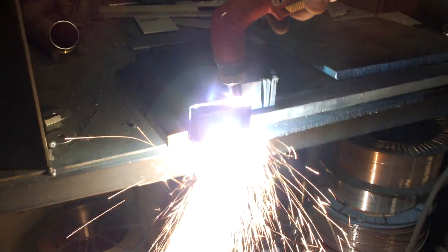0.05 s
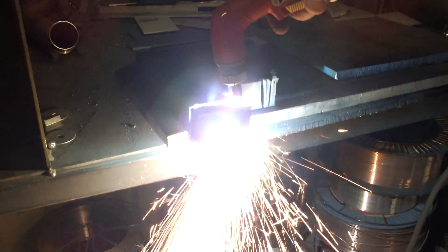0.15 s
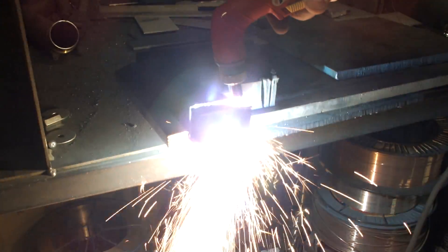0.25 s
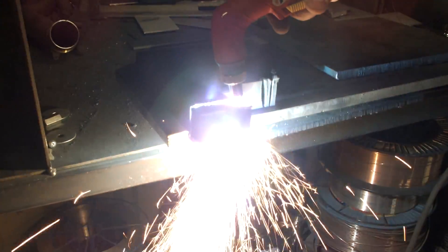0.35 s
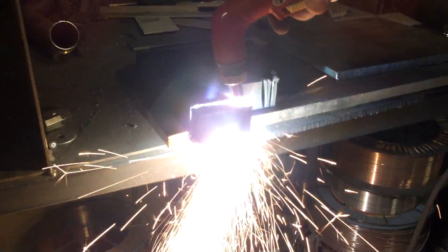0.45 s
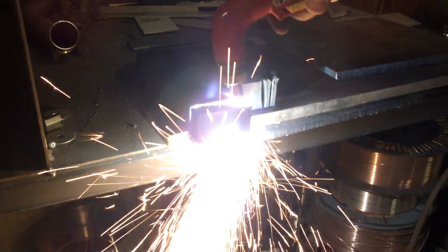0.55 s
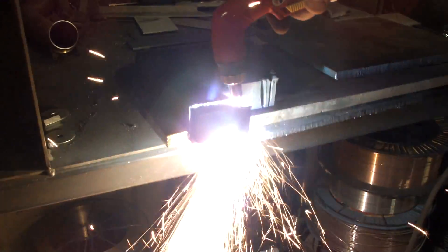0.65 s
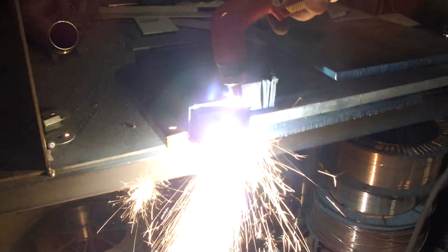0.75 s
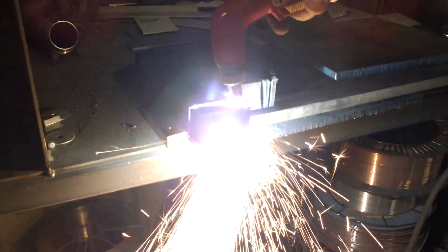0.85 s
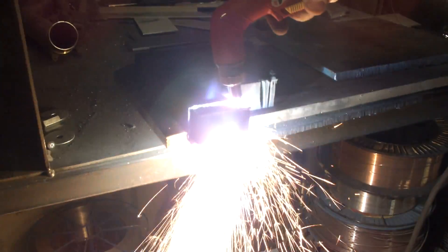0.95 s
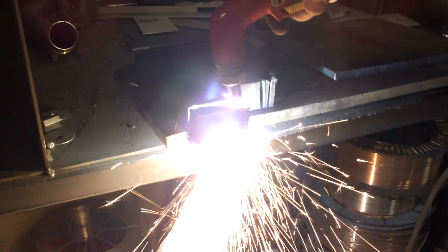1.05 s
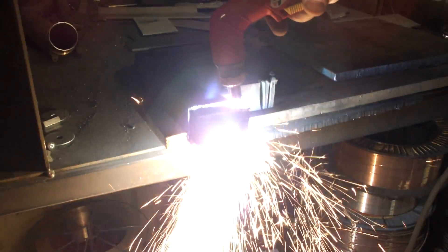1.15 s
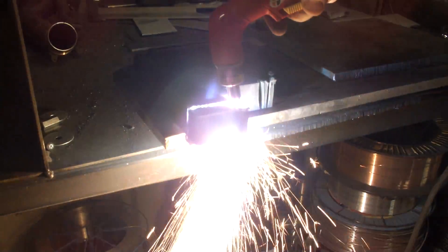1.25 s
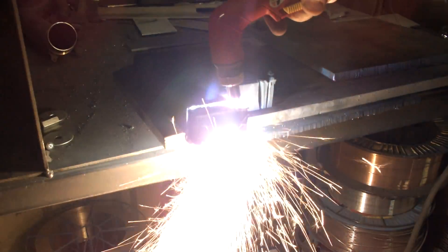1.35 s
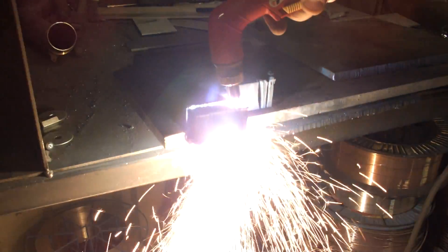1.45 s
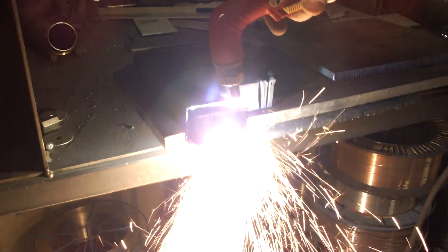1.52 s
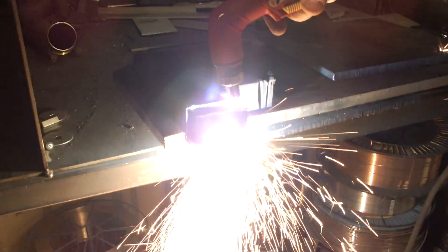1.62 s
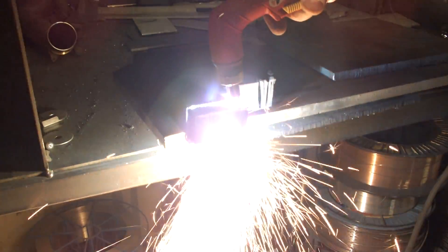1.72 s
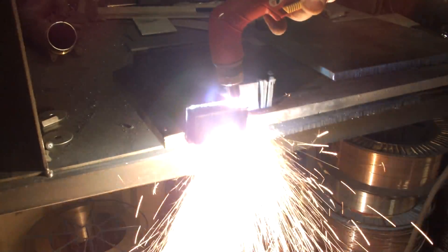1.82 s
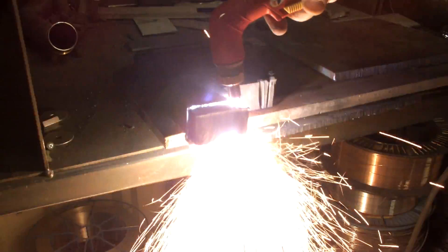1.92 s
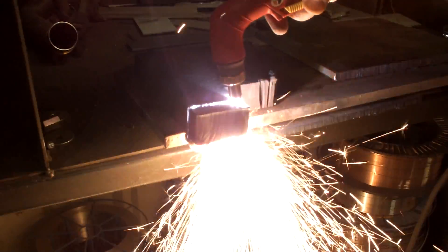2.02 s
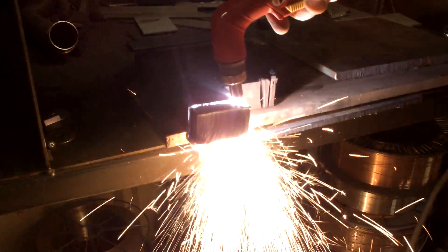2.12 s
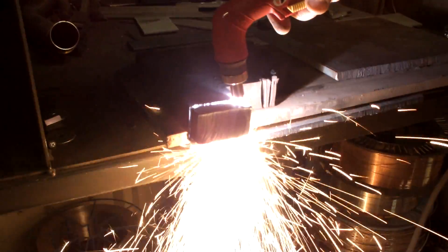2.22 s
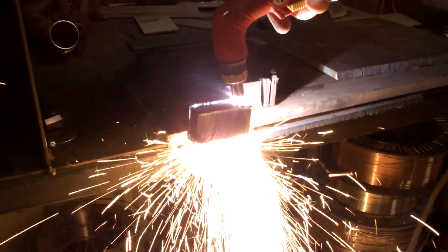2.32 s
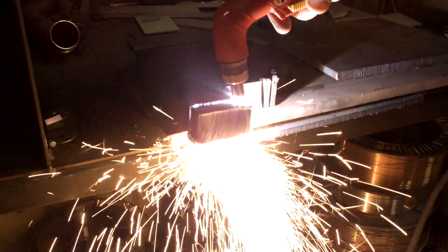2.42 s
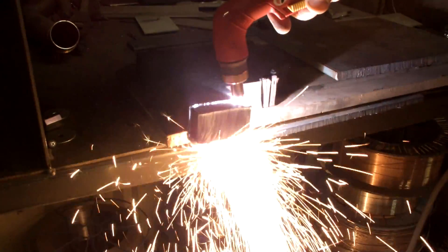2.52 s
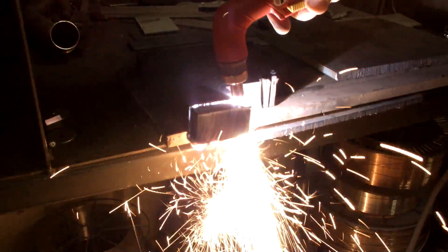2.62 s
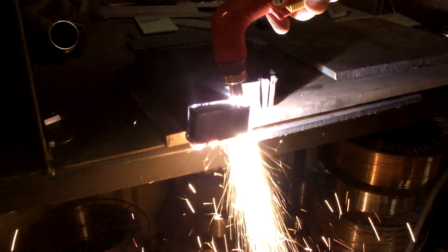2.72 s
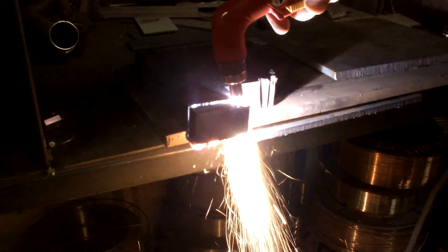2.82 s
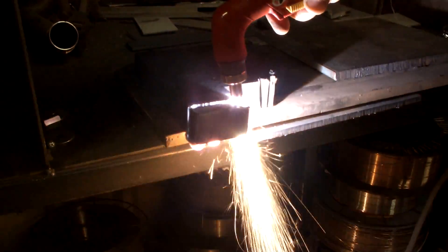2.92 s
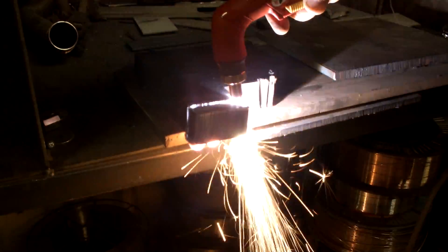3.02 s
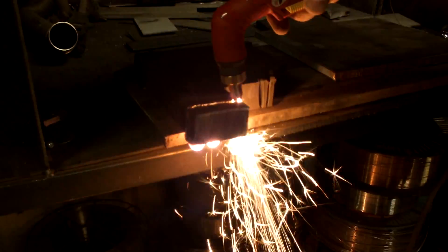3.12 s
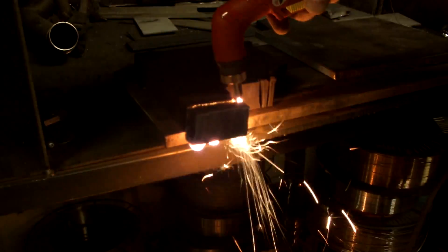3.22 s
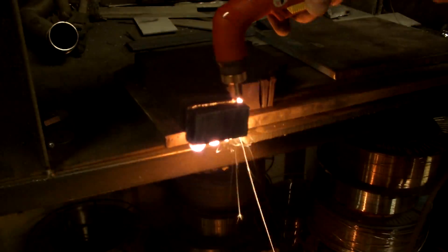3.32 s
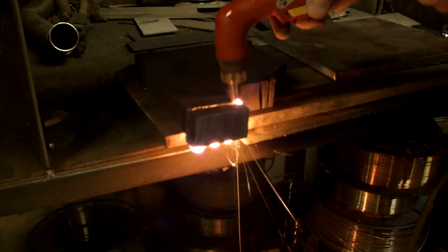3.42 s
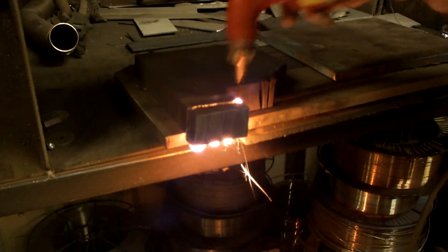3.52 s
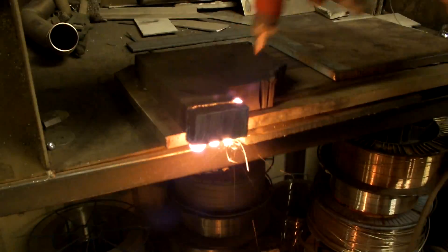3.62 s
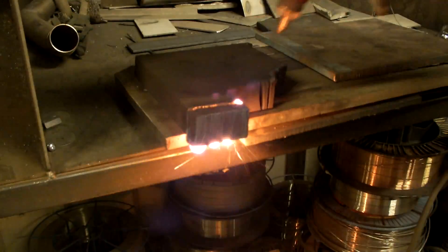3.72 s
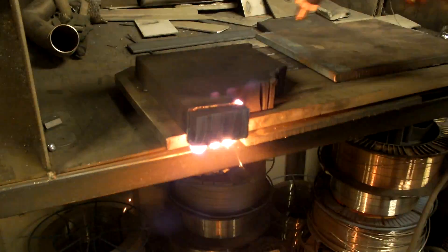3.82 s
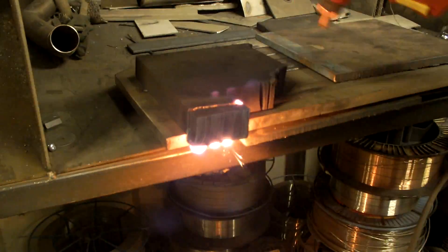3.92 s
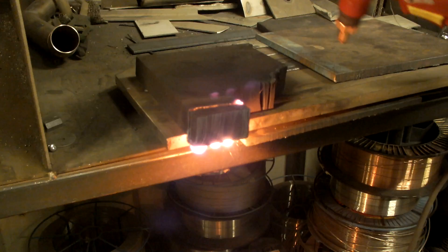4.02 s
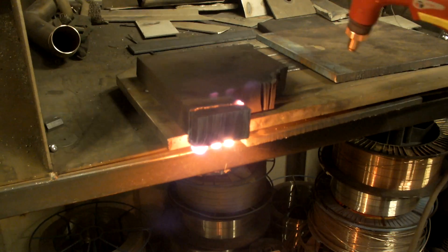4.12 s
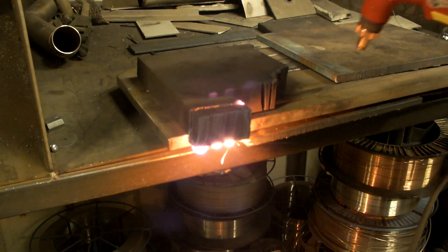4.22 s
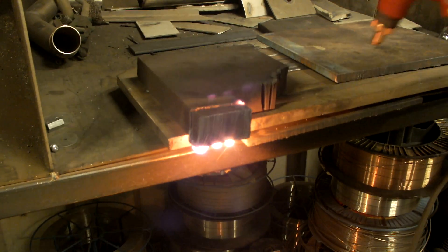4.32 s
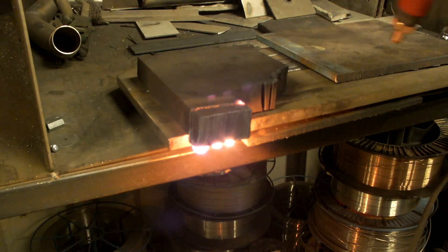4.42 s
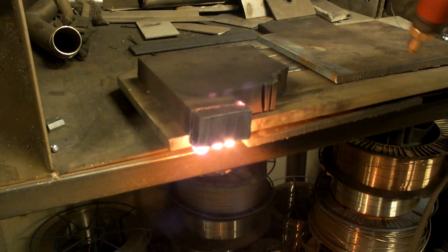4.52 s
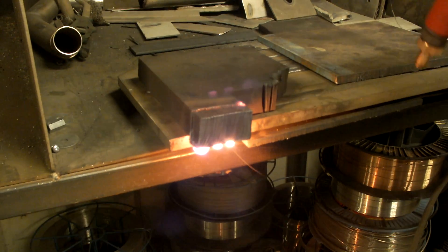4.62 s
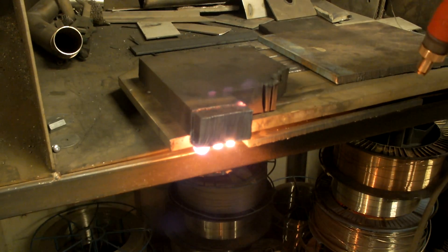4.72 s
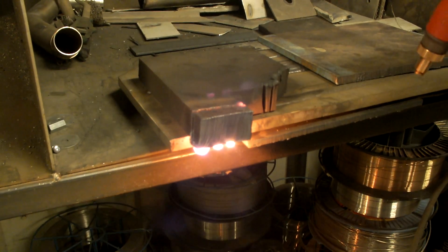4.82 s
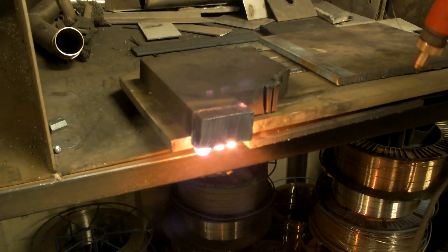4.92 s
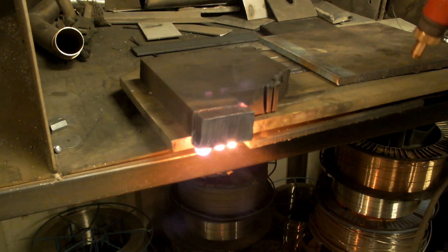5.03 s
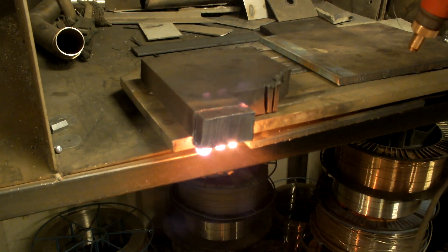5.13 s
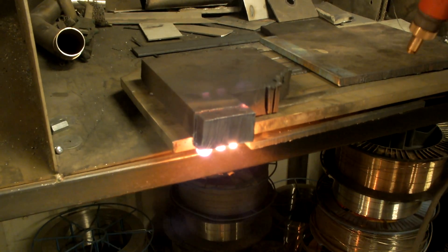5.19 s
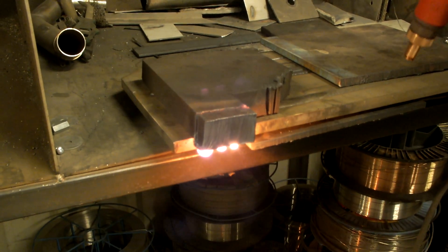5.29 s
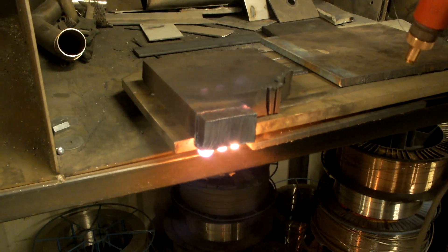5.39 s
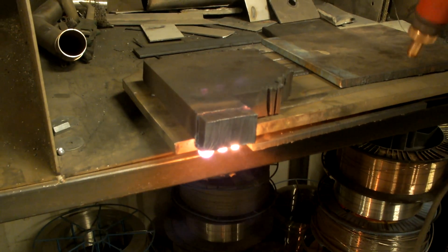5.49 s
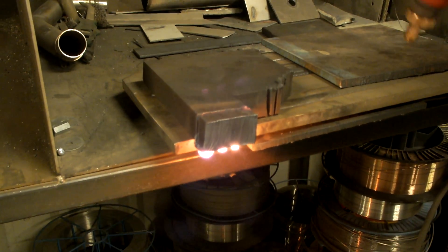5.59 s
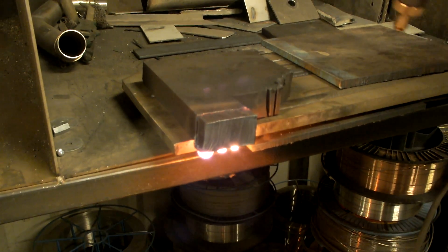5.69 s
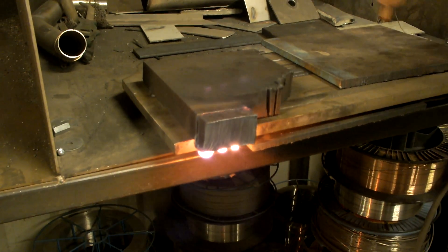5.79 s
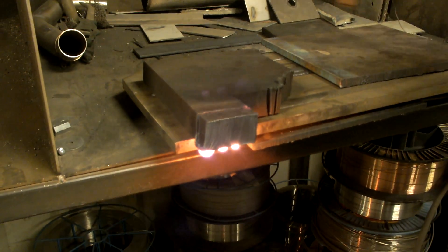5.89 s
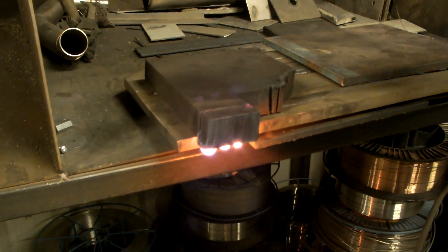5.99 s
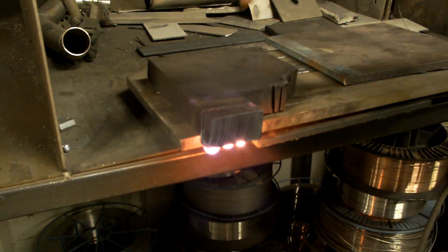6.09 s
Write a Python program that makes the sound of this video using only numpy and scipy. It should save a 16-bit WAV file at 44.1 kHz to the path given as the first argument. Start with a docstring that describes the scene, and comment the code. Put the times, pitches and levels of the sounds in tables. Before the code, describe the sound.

Close, dense roar of a cutting arc, fizzy and nearly constant, with low sputtering beneath and a thin electrical whine that fades before the end. The arc snaps off halfway. Much softer air rushes from the torch, muffled by the cut and then free and thin. Gear knocks dully, one plate rings briefly, and a sole scrapes the floor. Indoor workshop, stereo camera nearby, top treble cut off.

```python
"""In a workshop, a plasma torch cuts a thick steel block, a metre or two from a small stereo camera.
The arc jet is coloured noise, with slag and hot draught rumbling below it and a sine for the inverter's whine.
When the arc dies, the cooling air hisses on: first into the kerf (the cut slot), then free from the lifted torch.
Noise bursts with ringing notes make the gear's knocks, and three noises in short swells make a sole's scuffs.
Behind it all a fan hums in wavering tones over the dull rush of the shop air."""
import sys
import numpy as np
from scipy import signal
from scipy.fft import rfft, irfft, next_fast_len
from scipy.io import wavfile
from scipy.ndimage import uniform_filter1d

SR = 44100
rng = np.random.default_rng(int(sys.argv[2]) if len(sys.argv) > 2 else 0)


def generate_wav(signal):
    """Clip the signal to [-1, 1] and save it as 16-bit WAV at the path in sys.argv[1]."""
    frames = np.transpose(np.atleast_2d(signal))
    scaled = np.clip(frames, -1, 1) * 32767
    pcm = np.round(scaled).astype(np.int16)
    wavfile.write(sys.argv[1], SR, pcm)


N = 271215  # length in samples
LEFT_RIGHT = np.array([[1], [-1]])


def undb(db):
    """Turn decibels into a plain factor."""
    return 10 ** (np.asarray(db) / 20)


def level(x, db):
    """Scale a sound to an average (rms) level in dB."""
    return x * undb(db) / np.sqrt(np.mean(x ** 2))


def curve(rows):
    """Join the rows of a (time, value, ...) table by straight lines, one value per sample and column."""
    s, *columns = np.transpose(rows)
    t = np.arange(N) / SR
    return [np.interp(t, s, column) for column in columns]


def faded_curve(rows):
    """Like curve, but the first column drops by 60 dB within 10 ms outside the table's time span."""
    s = np.transpose(rows)[0]
    t = np.arange(N) / SR
    edge_db = np.interp(t, [s[0] - .01, s[0], s[-1], s[-1] + .01], [-60, 0, 0, -60])
    first, *rest = curve(rows)
    return [first + edge_db] + rest


def along(points, hz):
    """Join (pitch, value) points by straight lines over a logarithmic pitch axis."""
    f, v = np.transpose(points)
    return np.interp(np.log(hz + 1), np.log(f + 1), v)


def panned(db, left_minus_right_db):
    """Left and right factors for a level and a level difference between the sides."""
    return np.stack([undb(db + left_minus_right_db / 2), undb(db - left_minus_right_db / 2)])


def walk(rate):
    """Slow random curve of rms 1 that turns about rate times a second."""
    k = int(SR / rate)
    smooth = uniform_filter1d(uniform_filter1d(rng.standard_normal(N), k), k)
    return level(smooth, 0)


def hiss(colour, alike, lean, peaks=(), echo_rad=0, room_db=2.5, lag_s=0):
    """Stereo noise of rms 1, shaped by pitch in strength, likeness of the two sides and lean to the left."""
    size = next_fast_len(N)
    hz = np.arange(size // 2 + 1) * SR / size
    peak_db = sum(db / (1 + (2 * (hz - f) / width) ** 2) for f, width, db in peaks)
    # at a peak one sound path rules, so both sides agree more
    likeness = np.clip(along(alike, hz) + 0.041 * peak_db, -.95, .99)
    mid, side = rfft(rng.standard_normal((2, size)))
    pair = np.sqrt(1 + likeness) * mid + LEFT_RIGHT * np.sqrt(1 - likeness) * side
    # nearby echoes twist the phase between the sides every few hundred hertz
    twist = echo_rad * np.interp(hz, np.arange(0, SR, 250), rng.standard_normal(SR // 250 + 1))
    # a lag makes the left side late
    twist -= 2 * np.pi * hz * lag_s
    # far walls add a fine fixed ripple over pitch
    room = room_db * np.interp(hz, np.arange(0, SR, 16), rng.standard_normal(SR // 16 + 1))
    gain = undb(along(colour, hz) + room + peak_db + LEFT_RIGHT * along(lean, hz) / 2)
    turn = np.exp(.5j * LEFT_RIGHT * twist)
    return level(irfft(pair * gain * turn, size)[:, :N], 0)


def flicker(x, shared_db, own_db, rate):
    """Turbulence: all pitches surge together, and each third-octave band also flutters alone."""
    hz, s, z = signal.stft(x, SR, nperseg=256)
    edges = 100 * 2 ** np.arange(0, 8, 1 / 3)
    k = max(int(SR / 128 / rate), 1)
    # one random walk for each band, and a last one shared by all
    noise = rng.standard_normal((len(edges) + 1, len(s)))
    walks = uniform_filter1d(uniform_filter1d(noise, k), k)
    walks /= walks.std()
    # blend neighbouring bands smoothly
    place = np.interp(np.log(hz + 1), np.log(edges), np.arange(len(edges)))
    low = np.minimum(place.astype(int), len(edges) - 2)
    share = (place - low)[:, None]
    own = walks[low] * (1 - share) + walks[low + 1] * share
    flickered = z * undb(shared_db * walks[-1] + own_db * own)
    return signal.istft(flickered, SR, nperseg=256)[1][:, :N]


# strength of the arc jet: start_s [s], level_db [dB], left_minus_right_db [dB]
JET_LEVEL = [(0.0, -15.5, 1.5), (0.81, -15.5, 1), (0.97, -15.7, 1.5), (1.83, -16.5, 1), (2.41, -19, 0),
             (2.7, -16, -0.5), (2.85, -16.5, 0.5), (2.91, -17.2, -0.5), (3.05, -15.5, 0)]
# how far the jet has burst out below: start_s [s], share [0-1]
BREAKTHROUGH = [(0, 0.042), (1.0, 0.12), (1.4, 0.079), (2.03, 0.18), (2.12, 0.58), (2.5, 1), (2.65, 0.61),
                (3.05, 0.67)]
# jet colour while buried in the kerf, and after it breaks through: pitch_hz [Hz], relative_db [dB per Hz]
BURIED_COLOUR = [(410, -31), (700, -14.5), (1930, -9.5), (2170, -8.5), (2750, -7.5), (3610, -4.5),
                 (4160, -5.5), (5620, 0), (7290, -3.5), (8190, -3), (8740, -1), (9210, -3), (11600, -2),
                 (14300, -5.5), (15700, -11)]
THROUGH_COLOUR = [(350, -50), (600, -9.5), (778, -17.5), (844, -10.5), (1400, -7), (1520, -7), (1840, -6.5),
                  (2450, -2.5), (2810, -1.5), (4920, -1.5), (7210, -5), (8380, 2), (9730, -9), (11600, -1),
                  (15700, -10.5)]
# narrow peaks that room echoes put on the jet noise, before and after the breakthrough:
# pitch_hz [Hz], width_hz [Hz], boost_db [dB]
ECHO_PEAKS_BURIED = [(2228, 90, 4.2), (2422, 90, 3.7), (2627, 53, 3.1), (3305, 90, 3.9), (3692, 90, 3.2),
                     (4392, 90, 4.7), (4575, 70, 4.7), (4855, 74, 4.2), (5071, 90, 6.4), (5469, 90, 3.6),
                     (5706, 53, 3.9), (5986, 90, 4.9), (6610, 51, 3.0), (6761, 46, 4.1), (6987, 66, 5.1),
                     (7181, 61, 3.2), (7838, 83, 4.3), (7967, 90, 5.6), (8247, 65, 3.4), (9033, 70, 4.3),
                     (9237, 75, 4.9), (9614, 51, 3.8), (9722, 90, 3.9), (10400, 90, 3.3), (10529, 90, 3.7),
                     (11240, 68, 3.2), (11423, 89, 4.2), (12456, 90, 3.6)]
ECHO_PEAKS_THROUGH = [(1518, 90, 5.3), (1744, 67, 4.8), (1970, 59, 4.0), (2250, 90, 5.2), (2444, 90, 6.4),
                      (3326, 90, 4.7), (4565, 90, 3.6), (5092, 90, 5.2), (5760, 90, 3.9), (6201, 90, 5.5),
                      (6847, 90, 5.1), (7213, 90, 4.2), (7816, 74, 4.7), (8204, 73, 5.3), (9033, 53, 4.2),
                      (9226, 83, 3.8), (10109, 90, 4.1), (10712, 90, 4.1), (11014, 90, 4.1),
                      (12629, 88, 4.2), (12844, 72, 4.8), (13964, 90, 4.2)]
# likeness of the two sides near the jet: pitch_hz [Hz], likeness [0-1]
JET_ALIKE = [(60, 0.14), (130, 0.19), (290, 0.17), (640, 0.39), (1410, 0.61), (3100, 0.7), (6820, 0.5),
             (15000, 0.4)]
# lean of the jet to the left: pitch_hz [Hz], left_minus_right_db [dB]
JET_LEAN = [(60, 4), (110, 4), (200, 5), (380, 4), (700, 5), (1290, 4.5), (2380, -0.5), (4400, -1),
            (8120, 1.5), (15000, 0.5)]


def arc_jet():
    """The hot gas jet roars as turbulent noise; its middle pitches fill in once it is through the steel."""
    jet_db, pan_db = curve(JET_LEVEL)
    through = curve(BREAKTHROUGH)[0]
    buried = hiss(BURIED_COLOUR, JET_ALIKE, JET_LEAN, ECHO_PEAKS_BURIED, echo_rad=0.64, room_db=2.14)
    free = hiss(THROUGH_COLOUR, JET_ALIKE, JET_LEAN, ECHO_PEAKS_THROUGH, echo_rad=0.39, room_db=2.8)
    # square roots share out the power between the two colours
    roar = np.sqrt(1 - through) * buried + np.sqrt(through) * free
    return flicker(roar, shared_db=0.6, own_db=0.71, rate=11.0) * panned(jet_db, pan_db)


# strength of the sounds below the cut: start_s [s], slag_db [dB], draught_db [dB]
BELOW_LEVEL = [(0, -40.5, -52), (.37, -36, -50.5), (1.1, -39, -53), (1.3, -37, -50), (1.57, -46.5, -59),
               (1.7, -38.5, -53), (2.1, -44, -60), (2.27, -44, -72), (2.45, -46.5, -59), (2.77, -39.5, -50),
               (3.06, -42.5, -56)]
# colours of the molten slag and of the hot draught: pitch_hz [Hz], relative_db [dB per Hz]
SLAG_COLOUR = [(120, -43), (200, -4.5), (473, -1.5), (882, -6.5), (968, -6), (1500, -7.5), (1950, -7),
               (3300, -120)]
DRAUGHT_COLOUR = [(15, -44), (25, -15), (86, -5.5), (172, -1), (190, -18), (250, -35), (420, -120)]


def below_the_cut():
    """Molten slag sputters out below as flickering noise; hot draught rumbles under the bench."""
    slag_db, draught_db = curve(BELOW_LEVEL)
    slag = flicker(hiss(SLAG_COLOUR, JET_ALIKE, JET_LEAN), shared_db=2.5, own_db=0.5, rate=16)
    draught = hiss(DRAUGHT_COLOUR, JET_ALIKE, JET_LEAN)
    return slag * undb(slag_db) + draught * undb(draught_db)


# inverter tone in the arc, before ripple and shake: start_s [s], level_db [dB]
WHINE_LEVEL = [(0, -32), (.45, -26), (.87, -30), (1.02, -31), (1.23, -30), (1.43, -25.5), (1.9, -26.5),
               (2.05, -33), (2.19, -30), (2.28, -38), (2.36, -34), (2.47, -35)]
WHINE_HZ, RIPPLE_HZ, RIPPLE_DEPTH = 8633.5, 100, .45


def inverter_whine():
    """The arc sings at the inverter's switching tone, a high sine rippled by the mains."""
    t = np.arange(N) / SR
    # ripple on the arc current puts a side line above and below the tone
    ripple = 1 + RIPPLE_DEPTH * np.cos(2 * np.pi * RIPPLE_HZ * t)
    # the wandering arc length shakes the tone's phase and strength
    phase_shake = undb(-36) * walk(30)  # radians
    strength_shake_db = 1.1 * walk(25)
    tone = np.sqrt(2) * ripple * np.sin(2 * np.pi * WHINE_HZ * t + phase_shake)
    return tone * panned(faded_curve(WHINE_LEVEL)[0] + strength_shake_db, 2.5)


ARC_OFF_S, ARC_OFF_T60_S = 3.066, .06  # when the arc dies, and its time to fall by 60 dB


def arc():
    """Jet, slag and draught die with the arc; the whine fades out over half a second earlier."""
    t = np.arange(N) / SR
    alive = undb(-60 * np.maximum(t - ARC_OFF_S, 0) / ARC_OFF_T60_S)
    return alive * (arc_jet() + below_the_cut() + inverter_whine())


# strength of the air blown into the kerf: start_s [s], roar_db [dB], edge_fizz_db [dB]
KERF_AIR_LEVEL = [(3.075, -30.5, -34), (3.15, -36, -37.5), (3.27, -34.5, -35), (3.4, -32, -35),
                  (3.5, -38.5, -30.5), (3.55, -35, -36), (3.585, -45, -50), (3.74, -52, -48),
                  (3.8, -55, -50)]
# colours of the roar in the kerf and the fizz on its edge: pitch_hz [Hz], relative_db [dB per Hz]
KERF_COLOUR = [(530, -40), (900, -18), (1120, -14.5), (1980, -8.5), (2200, -4.5), (2780, -3), (3240, -5),
               (3470, -5.5), (4590, -8), (4910, -8), (5500, -8.5), (7150, -31), (12100, -120)]
EDGE_COLOUR = [(3240, -28), (5500, -1), (6640, -2.5), (7810, -1), (9110, -3.5), (12300, -3.5), (14700, -7),
               (15700, -15)]
# lean to the left of the kerf roar, the free air and the shop sounds: pitch_hz [Hz], left_minus_right_db [dB]
SHOP_LEAN = [(60, 3), (110, 3), (200, 0), (380, 1.5), (700, 3.5), (1290, 3), (2380, -0.5), (4400, -1.0),
             (8120, 2), (15000, 0)]


def kerf_air():
    """Cooling air roars inside the kerf and fizzes on its edge, as two turbulent noises."""
    roar_db = faded_curve(KERF_AIR_LEVEL)[0]
    fizz_db = faded_curve(np.array(KERF_AIR_LEVEL)[:, [0, 2]])[0]
    roar = undb(roar_db) * hiss(KERF_COLOUR, JET_ALIKE, SHOP_LEAN, echo_rad=0.45)
    fizz = undb(fizz_db) * hiss(EDGE_COLOUR, JET_ALIKE, JET_LEAN, echo_rad=0.3)
    return flicker(roar + fizz, shared_db=0.4, own_db=1.0, rate=16)


# strength of the air from the lifted nozzle: start_s [s], level_db [dB], left_minus_right_db [dB]
FREE_AIR_LEVEL = [(3.54, -43, 2), (3.62, -37.5, 1.5), (3.73, -34.5, 0), (3.93, -34, 0.5),
                  (4.2, -33.5, -0.5), (4.72, -35, -1), (5.0, -33, -0.5), (5.4, -34.5, -1),
                  (5.8, -33.5, -0.5), (6.15, -32, 0)]
# colour of that hiss: pitch_hz [Hz], relative_db [dB per Hz]
FREE_COLOUR = [(710, -40), (1200, -12), (1730, -9.5), (1950, -9), (2100, -3.5), (2810, -5.5), (2900, -1.5),
               (3130, -3), (4320, -2), (5470, -2), (8600, 0.5), (10800, 1), (14600, 2.5), (15700, -3.5)]
# likeness of its two sides: pitch_hz [Hz], likeness [0-1]
FREE_ALIKE = [(1000, 0.59), (3000, 0.95), (7000, 0.17), (11000, 0.29), (15000, 0.26)]
FREE_LAG_S = 3.8e-5  # the hiss reaches the left side this much late


def free_air():
    """The lifted nozzle blows into open air: a thin hiss that shifts a little between the sides."""
    level_db, pan_db = faded_curve(FREE_AIR_LEVEL)
    air = hiss(FREE_COLOUR, FREE_ALIKE, SHOP_LEAN, lag_s=FREE_LAG_S)
    return flicker(air, shared_db=0.64, own_db=0.14, rate=10) * panned(level_db, pan_db)


# knocks of the welder's gear, one row for each body that a blow shakes: start_s [s], level_db [dB],
# centre_hz [Hz], width [octaves], rise_s [s], hold_s [s], t60_s [s],
# note_db and ring_db [dB, relative to level_db]
KNOCKS = [(3.382, -32, 257, 0.63, 0.012, 0.013, 0.17, -16, -40),
          (3.397, -37.5, 746, 0.65, 0.0074, 0.017, 0.22, -20, -40),
          (3.535, -29, 896, 0.68, 0.0043, 0.0077, 0.16, -11, -3.5),
          (3.543, -39.5, 246, 0.94, .008, 0.017, 0.61, -20, -40),
          (4.823, -30, 768, 1.1, 0.0069, 0.031, 0.23, -9, -40),
          (4.824, -32, 2440, 0.89, 0.0035, 0.024, 0.22, -30, -40),
          (4.831, -38.5, 380, 1.3, 0.0092, 0.029, 0.92, -6.5, -40),
          (5.336, -25, 1970, 0.88, 0.0027, .003, 0.094, -20, -40)]
# notes of the knocked plate: pitch_hz [Hz], relative_db [dB], t60_s [s]
PLATE_NOTES = [(692, -11, 0.65), (869, -3, 0.23), (1350, -2, 0.3), (1440, -2, .3), (1543, 1, 0.42),
               (1520, -8, 0.41), (2050, -10, 0.43), (3550, -6, .12)]


def knocks():
    """Distant blows, smeared by the room into short dull bursts; a plate rings along, mostly faintly."""
    out = np.zeros((2, N + SR))
    t = np.arange(SR // 2) / SR
    hz = np.arange(len(t) // 2 + 1) * 2 + 1.
    for s, level_db, centre_hz, octaves, rise_s, hold_s, t60_s, note_db, ring_db in KNOCKS:
        mid, side = rng.standard_normal((2, len(t)))
        pair = mid + 0.23 * side * LEFT_RIGHT
        # a hump of noise, 12 dB down at the given width either side of its centre
        hump = undb(-12 * (np.log2(hz / centre_hz) / octaves) ** 2)
        body = level(irfft(rfft(pair) * hump, len(t)), -6.0)
        note = undb(note_db) * np.sin(2 * np.pi * centre_hz * t)
        blow = (body + note) * undb(-60 * np.maximum(t - hold_s, 0) / t60_s)
        for f, db, ring_t60_s in PLATE_NOTES:
            ring = np.sin(2 * np.pi * (f * t + rng.random()))
            blow = blow + undb(ring_db + db - 60 * t / ring_t60_s) * ring
        start = int(s * SR)
        out[:, start:start + len(t)] += undb(level_db) * blow * np.minimum(t / rise_s, 1)
    return out[:, :N] * undb(1.5 * LEFT_RIGHT)


# drags of a sole, start_s being the end of the rise: start_s [s], length_s [s], boom_db [dB], rub_db [dB],
# grit_db [dB]
SCUFFS = [(3.594, 0.04, -50, -41, -43.5), (3.695, 0.055, -56, -46, -45), (3.88, 0.023, -60, -48, -45.5),
          (4.157, 0.15, -54.5, -45, -47), (4.352, 0.14, -55, -45, -50), (4.905, 0.069, -52, -56, -54),
          (5.05, .06, -65, -59, -51), (5.143, .07, -47, -54, -52), (5.233, 0.071, -41.5, -42.5, -47.5),
          (5.326, 0.037, -38.5, -34.5, -29.5), (5.419, 0.035, -37, -37, -32), (5.487, 0.038, -38, -44, -47),
          (5.6, 0.059, -50.5, -56, -49), (5.873, 0.024, -66, -65, -53), (6.1, .05, -52.5, -52, -48)]
SCUFF_RISE_S, SCUFF_T60_S = 0.031, 0.29
# likeness of the two sides for the shop sounds: pitch_hz [Hz], likeness [0-1]
SHOP_ALIKE = [(60, 0.82), (130, 1), (290, 0.91), (640, 0.96), (1410, 0.74), (3100, 0.28), (6820, 0.57),
              (15000, 0.26)]


def scuffs():
    """A sole dragged over the floor: the floor booms, the sole rubs, grit scratches."""
    # colours: (Hz, relative dB per Hz)
    boom = hiss([(50, -55), (150, -24), (300, -6), (450, -4.5), (650, -1), (1000, -31)],
                SHOP_ALIKE, SHOP_LEAN)
    rub = hiss([(500, -23.5), (800, -4.0), (1050, -0.5), (1450, -5), (2200, -23)],
               SHOP_ALIKE, SHOP_LEAN)
    grit = hiss([(1200, -13), (1900, 4.5), (2500, 3.5), (3600, -0.5), (4600, -16), (8000, -40)],
                SHOP_ALIKE, SHOP_LEAN)
    t = np.arange(N) / SR
    power = 0
    for s, drag_s, *layers_db in SCUFFS:
        # each drag digs in, holds, then dies away in the room
        rise = np.clip(1 + (t - s) / SCUFF_RISE_S, 0, 1)
        fall = undb(-60 * np.maximum(t - s - drag_s, 0) / SCUFF_T60_S)
        power = power + (undb(layers_db)[:, None] * rise * fall) ** 2
    out = sum(layer * np.sqrt(p) for layer, p in zip((boom, rub, grit), power))
    return flicker(out, shared_db=0.5, own_db=1.7, rate=40)


# first and second blade tone before the hum curve: one level_db [dB] each
BLADE_LEVEL = (-60.5, -65.5)
# rise and fall of the hum: start_s [s], change_db [dB]
HUM_CHANGE = [(0, 2), (1.7, -1), (2.4, 2.5), (3.0, 10.5), (3.2, -5), (4.2, 0.5), (5.2, 1.5), (6.15, 1)]
BLADE_HZ, BLADE_WANDER_DB = 207.1, 2.6


def fan_hum():
    """Fan blades chop the air into two low tones that waver with the air load."""
    t = np.arange(N) / SR
    out = np.zeros((2, N))
    slow = signal.butter(1, 9.0, fs=SR, output="sos")
    for order, db in enumerate(BLADE_LEVEL, 1):
        waver = signal.sosfilt(slow, rng.standard_normal((2, N)))
        turn = 2 * np.pi * order * BLADE_HZ * t
        # 0.022 is the small steady part of the tone
        tone = level(waver[0] * np.sin(turn) + (waver[1] + 0.022) * np.cos(turn), db)
        hum_db = curve(HUM_CHANGE)[0] + BLADE_WANDER_DB * walk(2.2)
        out += tone * panned(hum_db, 4.0)
    return out


# colour of the shop air: pitch_hz [Hz], relative_db [dB per Hz]
SHOP_COLOUR = [(15, -54), (25, -45), (60, -22), (98, -13), (168, -29), (205, -1), (255, -15.5), (338, -6),
               (366, -19), (413, -4.5), (485, -16.5), (700, -12), (1020, -11.5), (1400, -18), (2560, -15),
               (3000, -11), (3900, -13.5), (6600, -120)]
SHOP_DB = -50


def shop_air():
    """The air of the shop is a dull rush: quiet noise that flickers slowly."""
    rush = hiss(SHOP_COLOUR, SHOP_ALIKE, SHOP_LEAN)
    return undb(SHOP_DB) * flicker(rush, shared_db=0.4, own_db=1.2, rate=3)


def scene():
    """All sources together, from the torch to the background."""
    return arc() + kerf_air() + free_air() + knocks() + scuffs() + fan_hum() + shop_air()


TOP_HZ = 15730


def record(dry):
    """The camera cuts the top steeply: a low-pass filter takes away the highest treble."""
    return signal.sosfilt(signal.ellip(14, .2, 65, TOP_HZ, fs=SR, output="sos"), dry)


dry = scene()
out = record(dry)
generate_wav(out)
```